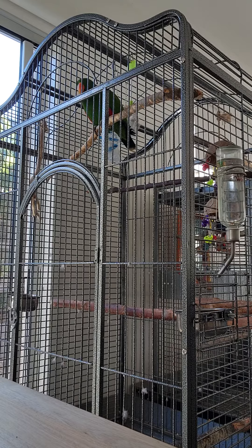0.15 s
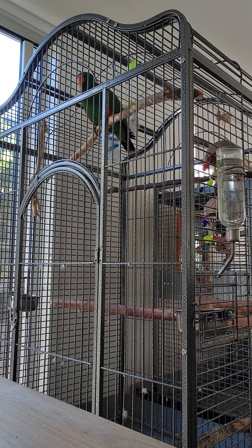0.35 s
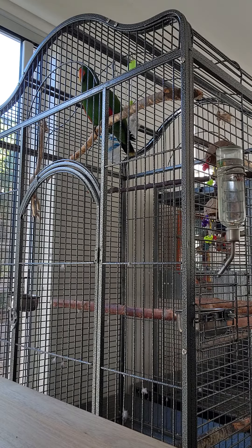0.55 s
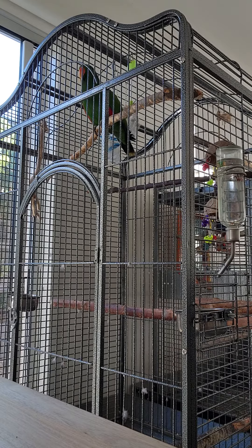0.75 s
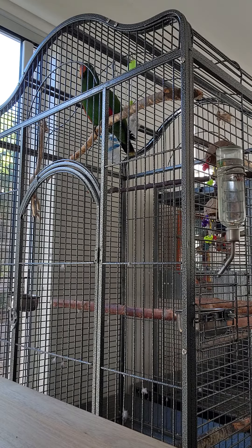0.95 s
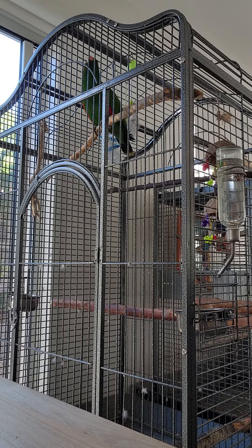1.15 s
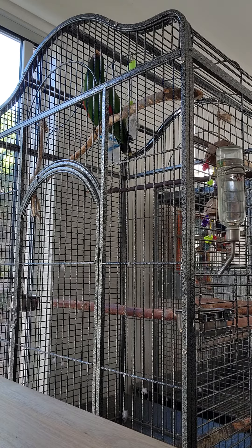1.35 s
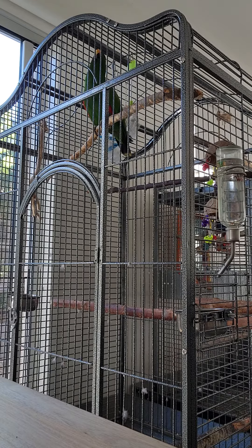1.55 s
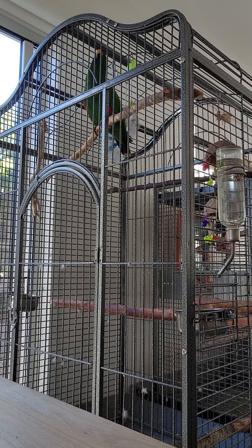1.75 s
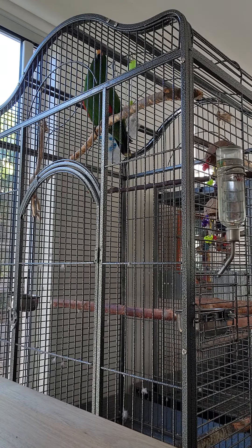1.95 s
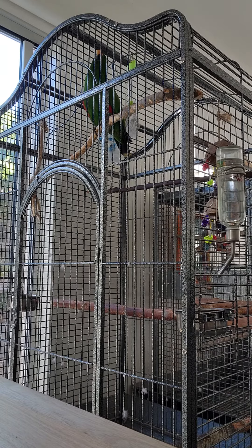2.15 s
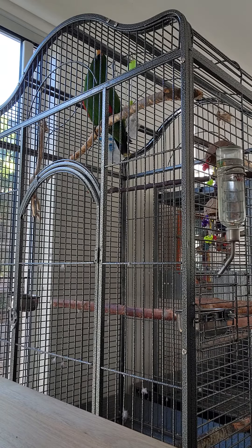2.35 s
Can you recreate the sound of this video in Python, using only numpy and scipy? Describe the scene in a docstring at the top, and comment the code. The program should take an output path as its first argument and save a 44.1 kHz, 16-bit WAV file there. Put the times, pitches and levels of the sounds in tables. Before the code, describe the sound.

A caged parrot whines, screeches harshly, whistles two cracked whining calls, then squawks in short rattles

```python
"""A parrot in a cage in a living room, about a metre from a phone with two microphone ports.
A falling whine breaks into a harsh growling screech while a second whine sounds with it, one from
each side of the syrinx. Two whines with cracked starts follow, then a run of short rattling squawks.
Whines and screech are stacked harmonics with breathy noise, squawks are slow pulses; all pass through
throat resonances. Echoes, a short room tail and a faint low room tone surround the bird."""
import sys
import numpy as np
from scipy import signal
from scipy.fft import rfft, irfft, next_fast_len
from scipy.io import wavfile
from scipy.ndimage import uniform_filter1d, minimum_filter1d

SR = 44100
rng = np.random.default_rng(int(sys.argv[2]) if len(sys.argv) > 2 else 0)


def generate_wav(signal):
    """Clip the signal to [-1, 1] and save it as 16-bit WAV at the path in sys.argv[1]."""
    frames = np.transpose(np.atleast_2d(signal))
    scaled = np.clip(frames, -1, 1) * 32767
    pcm = np.round(scaled).astype(np.int16)
    wavfile.write(sys.argv[1], SR, pcm)


N = 110250
TOP_HZ = 15600  # upper limit of the overtones and of the phone


def undb(db):
    """Decibels to gain."""
    return 10 ** (np.asarray(db) / 20)


def unit(x):
    """Scale to rms 1."""
    return x / np.sqrt(np.mean(x ** 2) + 1e-18)


def at(points, hz):
    """Read a (Hz, value) table on a log-frequency axis."""
    f, v = np.array(sorted(points)).T
    return np.interp(np.log(np.maximum(hz, 1)), np.log(f), v)


def colour(x, points, size=2048):
    """Causal minimum-phase filter with the given (Hz, dB) response, built by folding its cepstrum."""
    cepstrum = irfft(np.log(undb(at(points, np.fft.rfftfreq(size, 1 / SR)))))
    cepstrum[1:size // 2] *= 2
    cepstrum[size // 2 + 1:] = 0
    impulse = irfft(np.exp(rfft(cepstrum)))
    return signal.oaconvolve(x, impulse)[:N]


def wander(hz):
    """Random motion of rms 1, mostly slower than hz."""
    lowpass = signal.butter(2, min(hz, SR / 4), fs=SR, output="sos")
    return unit(signal.sosfilt(lowpass, rng.standard_normal(N)))


def shelf(x, hz, db):
    """Raise or lower everything above hz by a level curve."""
    low = signal.sosfiltfilt(signal.butter(6, hz, fs=SR, output="sos"), x)
    return low + undb(db) * (x - low)


def resonate(x, hz, stage_width):
    """A steep resonance: two band-passes in a row."""
    b, a = signal.iirpeak(hz, hz / stage_width, fs=SR)
    return signal.lfilter(b, a, signal.lfilter(b, a, x))


def glide(x, hz, half_width):
    """A steep resonance that follows the curve hz: shift it to zero, low-pass, shift back."""
    turn = np.exp(2j * np.pi * np.cumsum(hz) / SR)
    b, a = signal.bessel(3, half_width, fs=SR, norm="mag")
    return 2 * np.real(signal.lfilter(b, a, x / turn) * turn)


def room_tone():
    """Faint low rumble of the house: shaped noise, nearly the same at both ports."""
    # Each row: frequency in Hz, relative level in dB per Hz.
    rumble_shape = [(25, -1), (60, -4), (130, -7), (250, -7), (450, -12.5), (900, -16.5), (2000, -23.5),
                    (6000, -27), (9000, -40.5), (15000, -61)]
    level_db, side_db = -56.5, -17.5  # the side is relative to the middle
    mid, side = (unit(colour(rng.standard_normal(N), rumble_shape, size=8192)) for _ in range(2))
    return undb(level_db) * (mid + undb(side_db) * side * np.array([[1], [-1]]))


def room_response(noise):
    """Dense early scatter from the cage, plus a noise tail whose bands die at their own rates."""
    # Decay of the room. Each row: frequency in Hz, time to fall by 60 dB in s.
    decay = [(300, 0.56), (1500, 0.67), (4000, 0.46), (7000, 0.45), (14000, 0.53)]
    tail_db, early_db = -8, -4.5  # energy relative to the direct sound
    early_s, first_echo_s = 0.007, 0.0084  # decay time of the scatter, silence before both
    t, f = np.arange(SR) / SR, np.fft.rfftfreq(SR, 1 / SR)
    tail = 0
    for k, (_, t60) in enumerate(decay):
        # overlapping bands that add up to the whole spectrum
        share = at([(row[0], float(j == k)) for j, row in enumerate(decay)], f)
        band = irfft(rfft(noise[0]) * share)
        tail = tail + band * np.exp(-np.log(1000) * t / t60)
    early = noise[1] * np.exp(-t / early_s)
    after = t > first_echo_s
    return (undb(tail_db) * unit(tail * after) + undb(early_db) * unit(early * after)) / np.sqrt(SR)


def slaps(rate, jitter):
    """Uneven pulses of a slack membrane, and the count of its cycles."""
    scatter_db = 3  # rms spread of the pulse levels
    cycles = np.cumsum(rate * (1 + jitter * wander(150))) / SR
    pulses = np.diff(np.floor(cycles), prepend=0)
    return unit(pulses * undb(scatter_db * wander(160))), cycles


def squawks():
    """Slow uneven pulses with puffs of air ring three throat resonances and hum faintly in the body."""
    # Each row: start in s, time until release in s, pulses per s, relative level in dB, first, second
    # and third resonance in Hz, extra level of the first in dB, slide of the first in Hz per s.
    squawk_rows = [(1.93, 0.0086, 160, -29, 1710, 3150, 4530, -1, 2998),
                   (1.947, 0.0088, 160, -23.5, 2070, 3450, 3920, 7, -4),
                   (2.063, 0.026, 159.3, -32, 2115, 3906, 4700, 8, 5498),
                   (2.153, 0.019, 185.7, -19.5, 2136, 3445, 4580, -2, -2500),
                   (2.215, 0.026, 182.6, -25.5, 1870, 3440, 4590, 4, -1000),
                   (2.31, 0.056, 181.5, -36.5, 2050, 4130, 4990, -1, 0)]
    # One row per resonance: width setting in Hz (the band is 4/3 as wide), relative level in dB.
    resonances = [(175, -6.5), (380, -5), (420, -6)]
    # Sound that passes beside the resonances. Each row: frequency in Hz, level in dB.
    leak = [(200, -31), (700, -18.5), (1200, -21.5), (1700, -39), (2700, -32), (4500, -0.5), (5700, -9.5),
            (6400, -6.5), (6900, -13.5), (8300, -18.5), (9800, -32), (13500, -30), (15500, -49.5)]
    attack_s, release_s = 0.01, 0.028
    jitter, air_db, puff_cycles = 0.022, -3, 0.6  # rms share of the rate, puff level, puff decay
    shake, shake_hz = 0.043, 74  # rms share of each resonance frequency, speed
    body_hz, body_stage_width_hz, body_db = 321, 50, -5
    t, out = np.arange(N) / SR, 0
    for start, length, rate, db, *centres, first_db, slide in squawk_rows:
        pulses, cycles = slaps(rate, jitter)
        puffs = unit(np.exp(-(cycles % 1) / puff_cycles) * rng.standard_normal(N))
        attack = np.clip((t - start) / attack_s, 0, 1)
        release = np.exp(-np.maximum(t - start - length, 0) / release_s)
        envelope = undb(db) * attack * release
        source = (pulses + undb(air_db) * puffs) * envelope
        body = undb(body_db) * resonate(pulses * envelope, body_hz, body_stage_width_hz)
        out = out + colour(source, leak) + body
        throat = zip(centres, resonances, (first_db, 0, 0), (slide, 0, 0))
        for hz, (width, gain_db), extra_db, hz_per_s in throat:
            centre = hz * (1 + shake * wander(shake_hz)) + hz_per_s * np.clip(t - start, 0, length)
            ring = glide(source, centre, 2 * width / 3)
            # narrow resonances pass less energy, so they are lifted
            out = out + ring * undb(gain_db + extra_db) * np.sqrt(SR / width) / 2
    return out


def cracks():
    """Where a whine breaks, the membrane rattles for a moment against one throat resonance."""
    # Each row: middle in s, half length in s, resonance in Hz, level in dB.
    crack_rows = [(1.016, 0.0065, 5310, -31), (1.038, 0.0027, 4855, -20.5), (1.068, 0.0043, 5180, -39),
                  (1.152, .025, 2137, -37.5), (1.543, 0.0054, 1550, -18), (1.544, 0.012, 4660, -29),
                  (1.587, 0.0048, 1365, -24.5), (1.885, 0.0071, 1572, -21.5)]
    rate_hz, jitter, width_share = 330, 0.2, 0.1  # jitter is the rms share of the rate
    t, out = np.arange(N) / SR, 0
    for middle, length, hz, db in crack_rows:
        pulses, _ = slaps(rate_hz, jitter)
        rattle = unit(resonate(pulses, hz, hz * width_share))
        out = out + rattle * undb(db) * np.exp(-((t - middle) / length) ** 2)
    return out


def controls(rows):
    """A call's fade-in and fade-out gate, then each of its columns as a curve."""
    fade_s = 0.005
    t, (times, *columns) = np.arange(N) / SR, np.array(sorted(rows)).T
    gate = np.clip(1 + np.minimum(t - times[0], times[-1] - t) / fade_s, 0, 1)
    return [gate] + [np.interp(t, times, c) for c in columns]


def growl(hz):
    """A slow, unsteady second oscillation of the membrane."""
    drift = 0.12  # rms share of the growl rate
    return np.sin(2 * np.pi * np.cumsum(hz * (1 + drift * wander(hz))) / SR)


def syrinx(hz, jitter, rasp, gate, count=14):
    """Harmonics of a membrane with unsteady pitch and flickering overtones, plus air once a cycle."""
    waver, waver_hz = 0.006, 66  # rms share of the pitch, speed
    flicker_db, flicker_hz = 5, 36.5  # rms level change of each overtone, speed
    air_low_hz = 1300
    on = gate > 0
    phase = 2 * np.pi * np.cumsum((hz * (1 + jitter + waver * wander(waver_hz)))[on]) / SR
    harmonics = np.cos(phase)
    for k in range(2, count + 1):
        audible = k * hz[on] < TOP_HZ
        harmonics = harmonics + np.cos(k * phase) * audible * undb(flicker_db * wander(flicker_hz)[on])
    noise = rasp * rng.standard_normal(N) * np.sqrt(SR / 2 / hz)
    hiss, tone = np.zeros(N), np.zeros(N)
    hiss[on] = noise[on] * (1 + np.cos(phase))
    hiss = signal.sosfilt(signal.butter(4, air_low_hz, "high", fs=SR, output="sos"), hiss)
    tone[on] = np.sqrt(2) * harmonics
    return (tone + hiss) * gate


def screech():
    """The other side of the syrinx, overblown and growling, through open beak and moving resonance."""
    # Each row: time in s, pitch in Hz, relative level in dB, treble in dB, roughness (held to 0-1),
    # moving resonance in Hz.
    screech_rows = [(.208, 1013, -16.5, -8.5, 0.47, 2050), (.224, 1125, -9, -16, 0.7, 2230),
                    (.24, 1198, -16, 4.5, 0.6, 4600), (.262, 1239, -20.5, 8.5, 0.6, 3720),
                    (.29, 1257, -27.5, 17.5, 1.06, 4720), (.318, 1282, -28.5, 18, 1.02, 3700),
                    (.345, 1299, -23.5, 11, 0.8, 5700), (.38, 1234, -20, 6, 0.6, 5400),
                    (.398, 1145, -26.5, -3, .75, 3190), (.422, 995, -22, -12.5, .6, 2334)]
    # Throat with the beak wide open. Each row: frequency in Hz, level in dB.
    open_throat = [(500, -58.5), (1300, -56), (1800, -20.5), (2200, -6), (2800, -12.5), (3250, 3),
                   (3800, -4.5), (4300, -12.5), (4700, -1), (5150, -15), (6200, -7.5), (6750, -16.5),
                   (7600, -13), (8600, -27), (9900, -43.5), (11500, -32.5), (14700, -32.5), (16000, -37)]
    # at full roughness: rms pitch share, its speed, peak pitch share of the growl, air level
    jitter_share, jitter_hz, growl_bend, rasp_db = 0.068, 512, 0.035, -2.5
    growl_hz, growl_depth = 185, 0.6  # depth at full roughness
    treble_hz, peak_half_width_hz, peak_db = 2900, 650 / 3, 6
    gate, hz, db, treble_db, rough, peak_hz = controls(screech_rows)
    rough, beat = np.clip(rough, 0, 1), growl(growl_hz)
    jitter = rough * (jitter_share * wander(jitter_hz) + growl_bend * beat)
    source = syrinx(hz, jitter, rough * undb(rasp_db), gate)
    source = source * (1 + growl_depth * rough * beat) * undb(db) / 2
    voice = colour(shelf(source, treble_hz, treble_db), open_throat)
    return voice + undb(peak_db) * glide(voice, peak_hz, peak_half_width_hz)


def whines():
    """Nearly pure calls: syrinx harmonics through a nearly shut beak that favours the fundamental."""
    # One list per call. Each row: time in s, pitch in Hz, level before the throat in dB,
    # treble in dB, roughness (0-1).
    calls = [
        [(0, 1044, -20.5, -7.5, 0.16), (.028, 1027, -22.5, -13, 0.37), (.042, 1182, -31, -12, .35),
         (.08, 1100, -27.5, -12.5, .35), (.115, 904.6, -30.5, 0, 0.1), (.147, 770, -26.5, -0.5, .15),
         (.175, 575, -29, -17, 0.3), (.205, 445, -36.5, -7, .4)],
        [(.26, 1046, -28, -32.5, 0.2), (.31, 1300, -30.5, -19.5, 0.2), (.345, 1466, -15.5, -21, .05),
         (.38, 1554, -13, -10.5, 0), (.42, 1557, -11, -32, .08), (.445, 1624, -29.5, -31.5, 0.3),
         (.485, 1612, -15.5, -49, 0.25), (.525, 1547, -20, -13, 0.2), (.545, 1302, -28.5, -16, .3),
         (.585, 1190, -31.5, 6, .2), (.66, 826, -50, -21, 0)],
        [(1.013, 1448, -23.5, 0, 0.8), (1.022, 1571, -14.5, 6.5, .6), (1.037, 1597, -18, -3, 0.1),
         (1.054, 1609, -22, 6.5, 1), (1.065, 1560, -12.5, -1, 0.17), (1.10, 1506, -15.5, -4.5, 0.2),
         (1.145, 1570, -28.5, -7.5, 0.5), (1.19, 1528, -15.5, -9, 0.2), (1.22, 1435, -21, -10.5, 0.1),
         (1.243, 1361, -28, 5, 0.02), (1.275, 1513, -15, -1.5, 0.1), (1.298, 1546, -17.5, 1.5, .06),
         (1.325, 1558, -22.5, -1, 0.24), (1.34, 1580, -55, 3, 0.3)],
        [(1.533, 832.6, -26.5, 9, 0.8), (1.541, 917.7, -33, 16.5, 0.8), (1.555, 1074, -20.5, 4.5, 0.2),
         (1.578, 1278, -24, 4, 0.1), (1.588, 1388, -15.5, -5, .5), (1.602, 1290, -30.5, 5, 0.4),
         (1.643, 1295, -18, 3, 0.1), (1.647, 1553, -8, -9.5, 0.12), (1.69, 1556, -16.5, -2.5, .05),
         (1.72, 1553, -10, -8.5, 0), (1.75, 1590, -21, 0, 0.14), (1.80, 1620, -26, 0.5, 0.07),
         (1.855, 1690, -18, -3.5, 0.05), (1.876, 1625, -32, -5, 0.3), (1.887, 1635, -32, 5.5, .9),
         (1.90, 1667, -16.5, -23, 0), (1.93, 1597, -41, -1, .14)],
    ]
    # Throat with the beak nearly shut. Each row: frequency in Hz, level in dB.
    shut_throat = [(200, -49.5), (520, -14.5), (800, -12.5), (1050, -8.5), (1320, -8.5), (1540, -3),
                   (1700, -9.5), (2050, -11), (2600, -16.5), (3150, -31), (3700, -27), (4200, -21.5),
                   (4750, -21.5), (5500, -7), (6000, -32), (6550, -17.5), (7200, -38), (9800, -63.5),
                   (11300, -45), (15000, -60)]
    # at full roughness: rms pitch share, its speed, growl depth, air level
    jitter_share, jitter_hz, shimmer, rasp_db = 0.08, 450, 0.33, -11
    treble_hz, growl_hz = 1760, 398
    out = 0
    for rows in calls:
        gate, hz, db, treble_db, rough = controls(rows)
        rough = np.clip(rough, 0, 1)
        jitter = jitter_share * rough * wander(jitter_hz)
        source = syrinx(hz, jitter, rough * undb(rasp_db), gate)
        source = source * undb(db) * (1 + shimmer * rough * growl(growl_hz))
        out = out + shelf(source, treble_hz, treble_db)
    return colour(out, shut_throat)


def scene():
    """The bird reaches the left port first; wall echoes and room follow, partly alike at both ports."""
    # Wall echoes. Each row: delay in s, level in dB, lead at the left port in s.
    echoes = [(.0036, -13.5, .0002), (.0079, -15, -.0002), (0.0123, -8, .0001), (0.0191, -21, -.0003)]
    # Balance of the two ports. Each row: frequency in Hz, left minus right in dB.
    balance = [(200, -3.5), (1000, -6.5), (1550, -3.5), (2600, -6.5), (3600, -2), (5100, -11.5),
               (6300, -10.5), (7100, 15), (8200, 3.5), (9500, 9), (11500, 5), (15000, -5)]
    port_lag_s, likeness = 0.000065, 0.15  # likeness: share of room energy common to both ports
    bird = whines() + cracks() + screech() + squawks()
    size = next_fast_len(N + SR)
    f, sound = np.fft.rfftfreq(size, 1 / SR), rfft(bird, size)
    shared, ports = rng.standard_normal((2, SR)), []
    for side in (1, -1):  # left, right
        noise = np.sqrt(likeness) * shared + np.sqrt(1 - likeness) * rng.standard_normal((2, SR))
        path = 1 + rfft(room_response(noise), size)
        path = path * np.exp(1j * np.pi * f * side * port_lag_s)
        for delay, db, lead in echoes:
            path = path + undb(db) * np.exp(-2j * np.pi * f * (delay - side * lead / 2))
        port_gain = undb(side * at(balance, f) / 2)
        ports.append(irfft(sound * path * port_gain, size)[:N])
    return np.array(ports) + room_tone()


def record(dry):
    """The phone's limiter ducks both ports at peaks above full scale; a steep low-pass cuts the top."""
    limit, limit_s = 1, 0.001
    size = max(int(limit_s * SR), 1)
    need = np.minimum(1, limit / (np.abs(dry).max(axis=0) + 1e-9))
    gain = uniform_filter1d(minimum_filter1d(need, 2 * size), size)
    lowpass = signal.ellip(10, .1, 80, TOP_HZ, fs=SR, output="sos")
    return signal.sosfilt(lowpass, dry * gain)


dry = scene()
out = record(dry)
generate_wav(out)
```